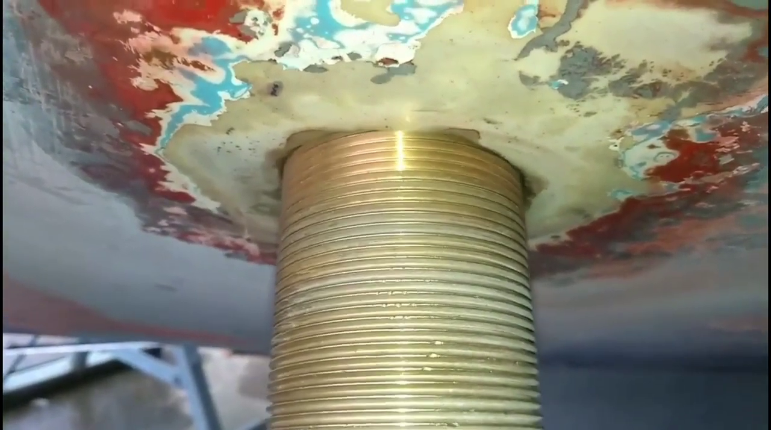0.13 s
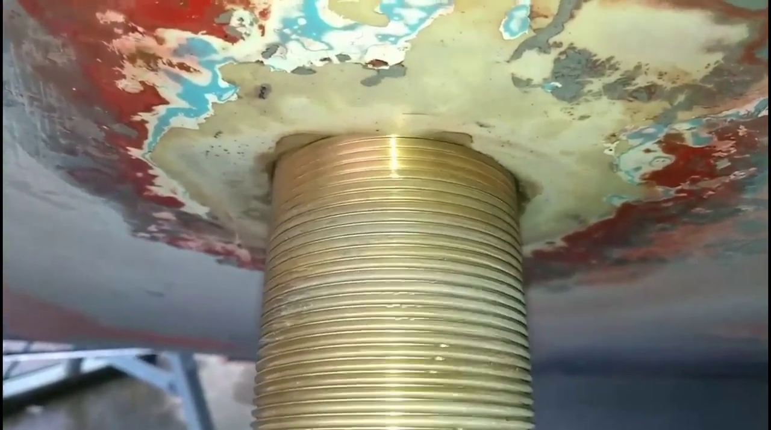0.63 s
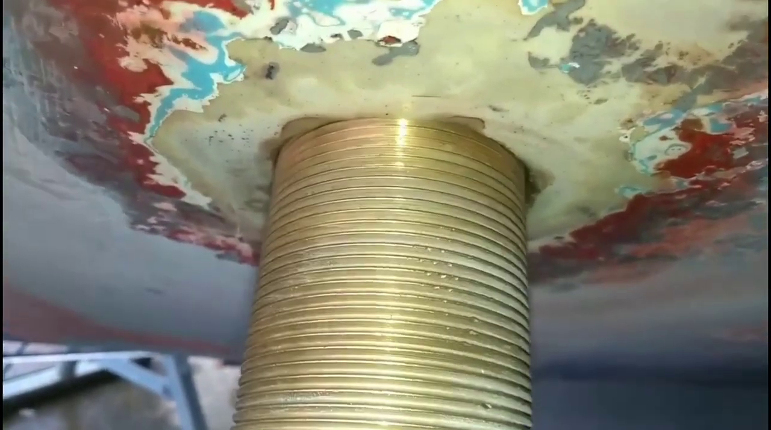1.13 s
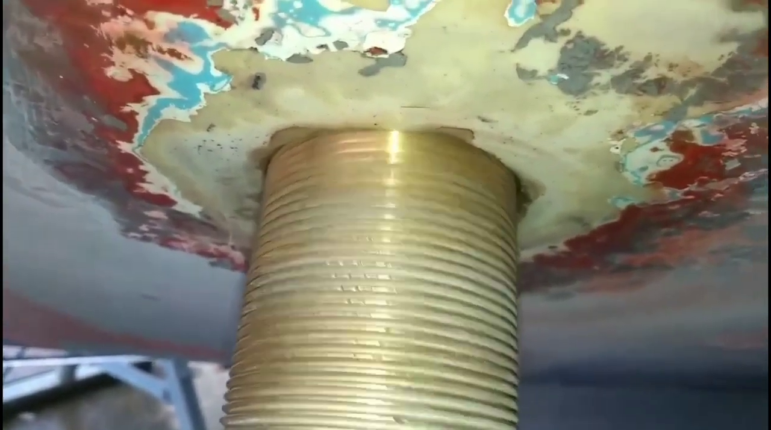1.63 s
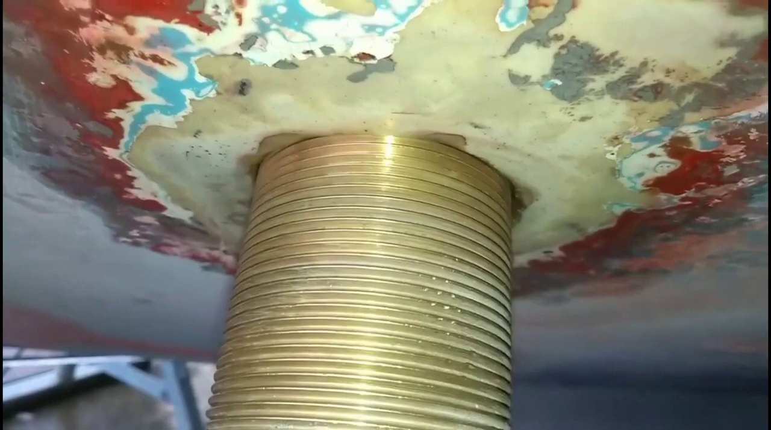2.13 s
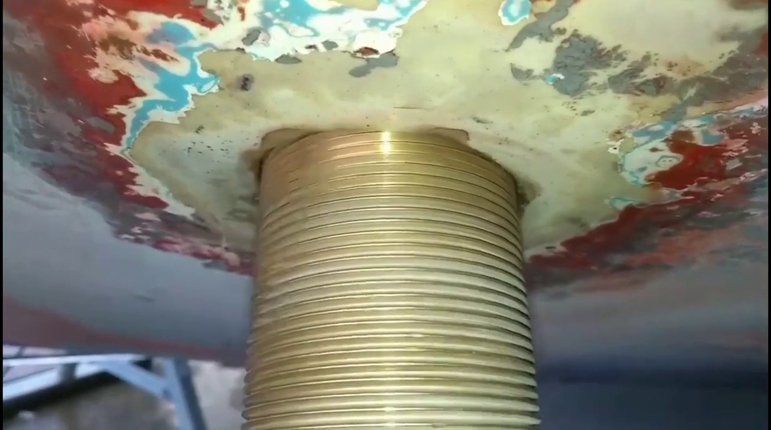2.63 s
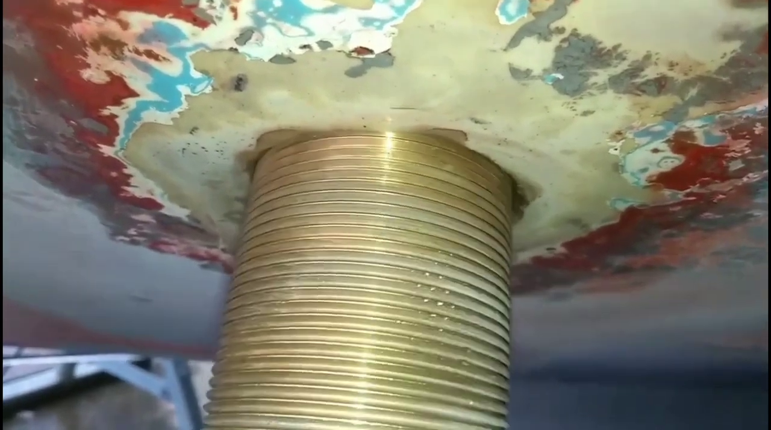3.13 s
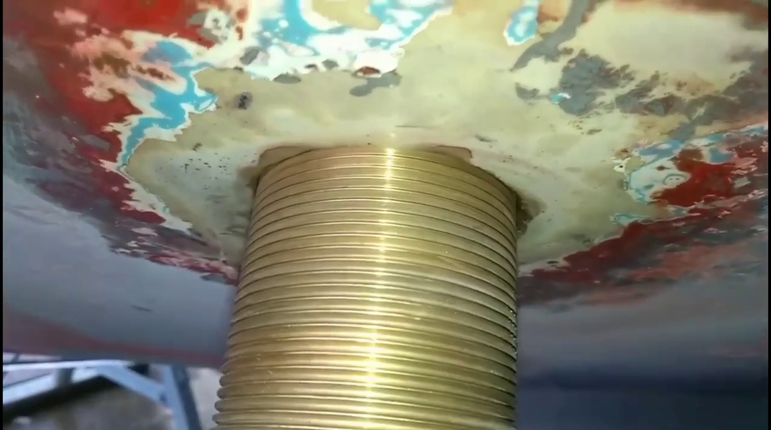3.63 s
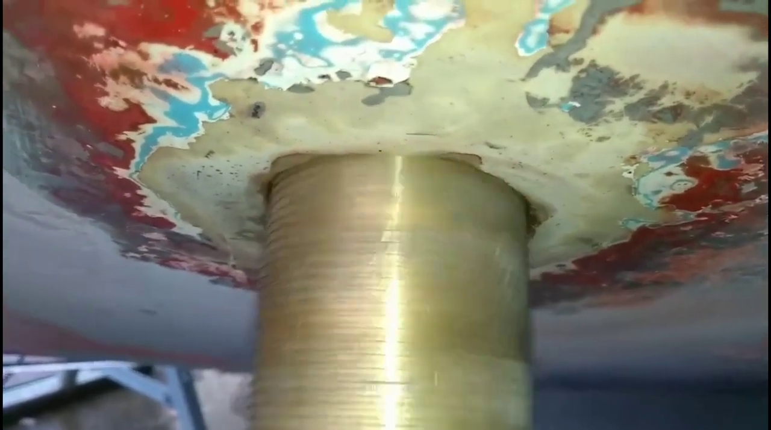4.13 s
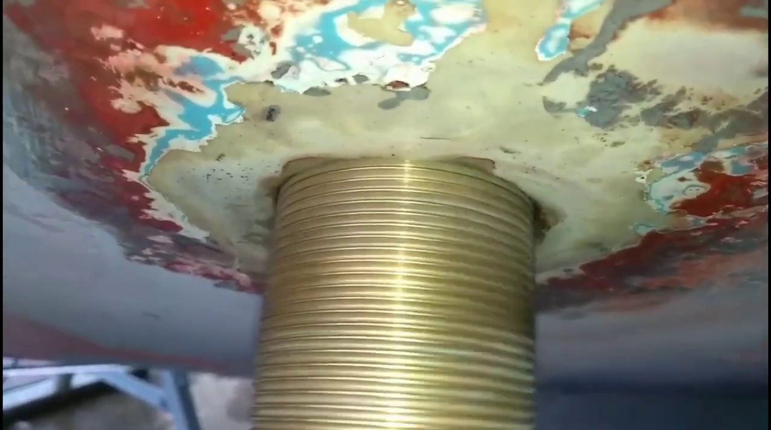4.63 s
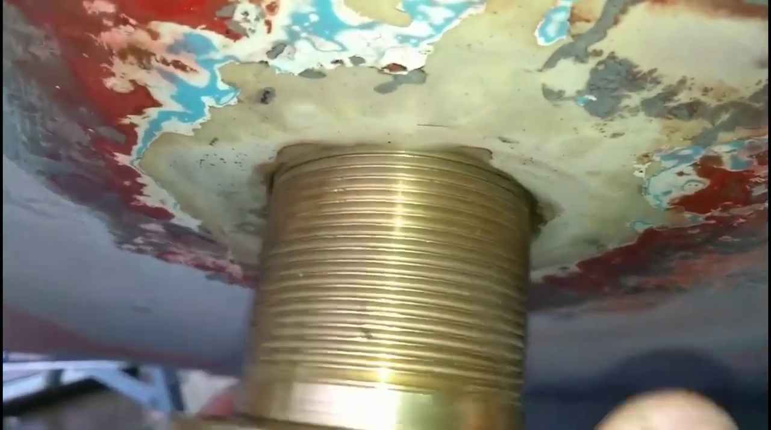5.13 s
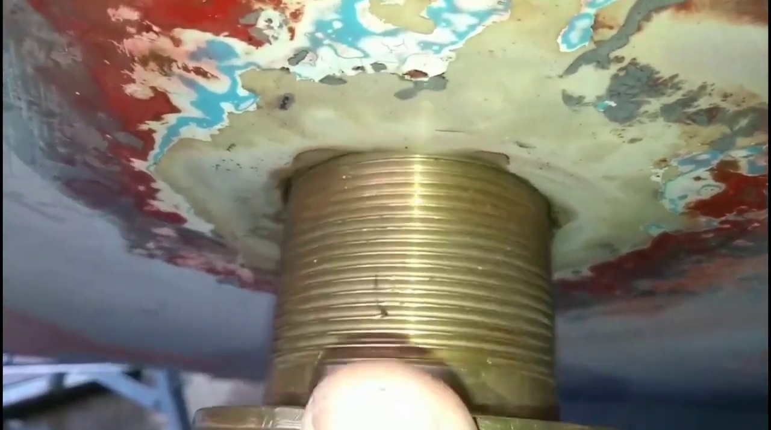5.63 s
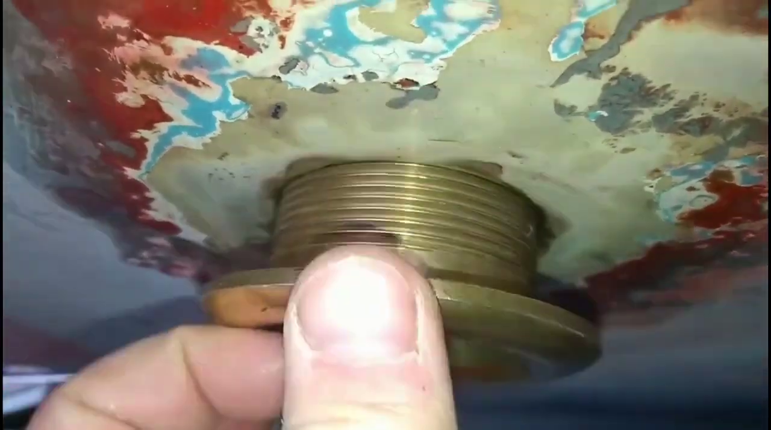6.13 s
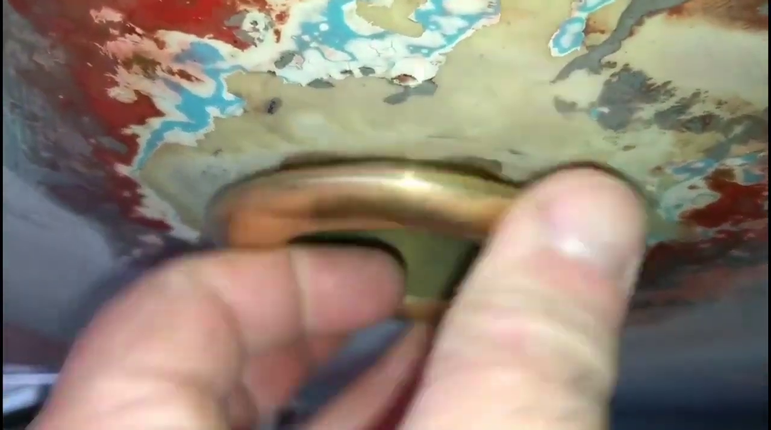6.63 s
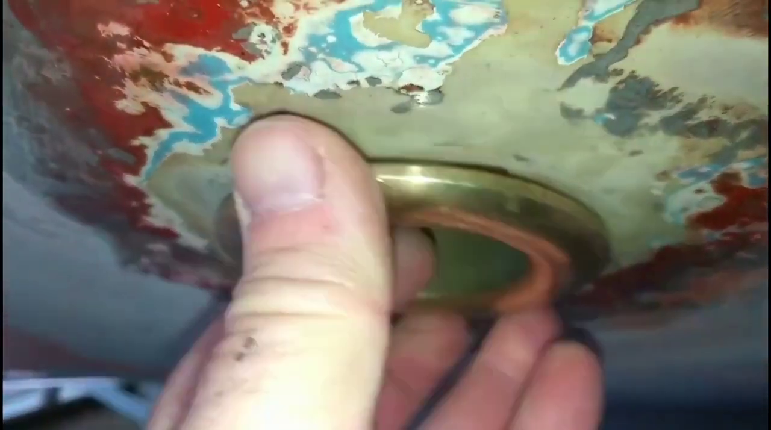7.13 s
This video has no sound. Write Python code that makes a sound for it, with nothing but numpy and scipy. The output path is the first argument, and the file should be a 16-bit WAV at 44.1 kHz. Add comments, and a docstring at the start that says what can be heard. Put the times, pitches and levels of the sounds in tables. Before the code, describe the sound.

Quiet yard hum, faint metal hiss and scattered hull knocks, then thicker scraping and clinking that peaks in two loud bursts of metallic rattling.

```python
"""A quiet yard hums throughout, with rumble from handling and breeze; a brass tube murmurs faintly under the fingers.
Rocked and pushed by hand into a tight hole in a hollow boat hull, it gives faint treble hiss and scattered knocks.
A hard knock at 3.4 s leads to dry rasps; from 4 s on the threads catch more thickly and the tube clinks more.
The loudest burst, near 6 s, and another near 6.8 s knock the hull and ring the tube; then the yard remains.
Knocks and clinks are sums of dying modes, grind and hiss are dense tiny slips plus noise, yard and rumble noise."""
import sys
import numpy as np
from scipy import signal
from scipy.io import wavfile
from scipy.ndimage import uniform_filter1d

SR = 44100
rng = np.random.default_rng(int(sys.argv[2]) if len(sys.argv) > 2 else 0)


def elevation(decibels):
    """Turn decibel levels (scalar or array-like) into linear amplitude ratios."""
    levels = np.asarray(decibels, float)
    return 10 ** (levels / 20)


def dump_mix(stems):
    """Bounce the given channels to the path in sys.argv[1] as a 16-bit WAV at rate SR."""
    frames = np.atleast_2d(stems).T  # one column per channel
    limited = np.clip(frames, -1, 1)  # hard clip at full scale
    pcm = np.round(limited * 32767).astype(np.int16)
    wavfile.write(sys.argv[1], SR, pcm)


N = 320607  # length in samples


def evened(x):
    """Scales to rms 1."""
    return x / np.sqrt(np.mean(x ** 2) + 1e-20)


def peaked(x):
    """Scales to peak 1."""
    return x / (abs(x).max() + 1e-20)


def bandpass(x, order, low_hz, high_hz):
    """Keeps one band of x."""
    return signal.sosfilt(signal.butter(order, [low_hz, high_hz], "band", fs=SR, output="sos"), x)


def levelled(x, low_hz, high_hz):
    """Scales x so that one band of it has rms 1."""
    return x / bandpass(x, 4, low_hz, high_hz).std()


def read(points, hz):
    """Reads a table on a log-frequency axis."""
    f, value = np.transpose(points)
    return np.interp(np.log(hz + 1), np.log(f + 1), value)


def rising(t, rise):
    """Soft start over rise seconds."""
    return 1 - np.exp(-(t / rise) ** 2)


def wander(shape, span):
    """Slow random drift of rms 1: white noise averaged twice over span samples."""
    x = uniform_filter1d(rng.standard_normal(shape), span)
    return evened(uniform_filter1d(x, span))


def add(mix, s, sound):
    """Mixes a sound in at s seconds."""
    part = mix[round(s * SR):][:len(sound)]
    part += sound[:len(part)]


def noise(spectrum, patchy_db, size):
    """Random short-time spectra with drifting patches."""
    hz = np.fft.rfftfreq(size, 1 / SR)
    real, imag, patches = rng.standard_normal((4 * N // size + 5, len(hz), 3)).T
    patches = uniform_filter1d(patches, 10, 0)  # across frequency
    patches = evened(uniform_filter1d(patches, 6, 1))  # across time
    z = (real + 1j * imag) * elevation(read(spectrum, hz)[:, None] + patchy_db * patches)
    return evened(signal.istft(z, nperseg=size, noverlap=3 * size // 4)[1][:N])


def rings(modes, t, lag=0):
    """One dying sine for each mode; all fall into step lag seconds after the start."""
    hz, db, t60 = np.transpose(modes)[:, :, None]
    return elevation(db - 60 * t / t60) * np.sin(2 * np.pi * hz * (t - lag))


def detuned(modes, ratio):
    """The same modes with each frequency multiplied by its ratio."""
    moved = modes.copy()
    moved[:, 0] *= ratio
    return moved


def chatter(modes, per_s, spread_db):
    """Tiny uneven slips, each striking every mode with its own strength."""
    slips = elevation(spread_db * np.minimum(rng.exponential(1, N), 4)) * (rng.random(N) < per_s / SR)
    at, out = np.flatnonzero(slips), np.zeros(N)
    for hz, db, t60 in modes:
        force, radius = slips.copy(), elevation(-60 / t60 / SR)
        force[at] *= rng.standard_normal(len(at))
        turn = 2 * np.pi * hz / SR
        resonator = [1, -2 * radius * np.cos(turn), radius * radius]
        out += elevation(db) * signal.lfilter([np.sin(turn)], resonator, force)
    return evened(out)


# colour of the distant wash: (f/Hz, relative level/dB per Hz)
YARD_COLOUR = [(65, -42), (110, -10), (171, -1), (378, -16.5), (550, -12.5), (909, -13.5), (1700, -18),
               (3120, -30.5), (7360, -29.5), (8340, -33.5), (10100, -31), (12400, -30), (13000, -41.5),
               (15000, -40.5), (16300, -52.5)]
# handling and breeze on the microphone: (t/s, level/dB), before the gusts
RUMBLE_LEVEL = [(0, -70), (.3, -61.5), (.55, -65.5), (3.9, -67.5), (4.0, -53.5), (4.4, -52.5), (4.7, -60.5),
                (5.1, -50), (5.5, -68.5), (5.85, -62), (5.999, -50), (6.4, -63.5), (7.27, -65)]
# colour of that rumble: (f/Hz, relative level/dB per Hz)
RUMBLE_COLOUR = [(25, -18), (50, -1.5), (88, 6), (125, -18.5), (300, -51.5), (600, -91)]


def yard():
    """Steady distant wash and a low rumble that swells and comes in gusts, both shaped noise."""
    s, db = np.transpose(RUMBLE_LEVEL)
    gusts_db = 1.4 * wander(N, 2500)
    swell = elevation(np.interp(np.arange(N) / SR, s, db) + gusts_db)
    wash = elevation(-72) * noise(YARD_COLOUR, 0.34, size=4096)
    return wash + swell * noise(RUMBLE_COLOUR, 1.6, size=4096)


# reverberation inside the hull: (f/Hz, t60/s)
CABIN_DECAY = [(150, 0.16), (500, 0.12), (1500, 0.11), (5000, 0.092)]


def cabin(x):
    """The hollow behind the hull: sparse taps of random sign, each band dying at its own speed."""
    taps = np.zeros(SR // 2)
    at = np.arange(300, len(taps) - 20, 20)
    taps[at + rng.integers(0, 20, len(at))] = rng.choice([-1., 1.], len(at))
    hz, t, z = signal.stft(taps, SR, nperseg=256)
    tail = signal.istft(z * elevation(-60 * t / read(CABIN_DECAY, hz)[:, None]), SR, nperseg=256)[1]
    return signal.oaconvolve(x, tail / np.linalg.norm(tail))[:N]


SEATED_S = 4.4  # from about here the tube sits deep in the hole
# modes of the brass tube, also played by rub() and clinks(): (f/Hz, relative level/dB, t60/s)
TUBE_MODES = [(2367, -4, 0.15), (2433, 5, 0.033), (3867, 2.5, 0.15), (3910, -12, 0.09), (5900, -12, 0.16),
              (6447, 4, 0.13), (6680, -5, 0.067), (7030, -1.5, .05), (7546, 2, 0.14), (8160, -1, 0.14),
              (9400, -6.5, 0.12), (9770, -7.5, 0.074), (11590, -11, 0.08), (11930, -2.5, 0.11),
              (13010, -9.5, .08), (14620, -17, .07), (15216, -11.5, .09)]


def murmur():
    """Resting fingers shift a little and keep middle rings of the tube alive until it is seated."""
    seating_s = .3
    free = 1 / (1 + np.exp((np.arange(N) / SR - SEATED_S) / seating_s))
    drift = elevation(2.5 * wander(N, 4000))
    middle = [TUBE_MODES[5], TUBE_MODES[7], TUBE_MODES[8]]
    return elevation(-91.5) * drift * free * chatter(middle, 150, 2.5)


# dry drags of the thread flank: (start t/s, length/s, level/dB)
RASP_STROKES = [(3.505, .055, -62), (3.57, .1, -74), (3.66, .15, -67), (4.87, .33, -64)]
# their colour: (f/Hz, relative level/dB per Hz)
RASP_COLOUR = [(1500, -35), (2000, -8), (2900, -2), (3300, -33), (5500, -8), (6300, 5), (7800, -3),
               (8500, -41)]


def rasp():
    """The thread flank drags: short strokes of grainy noise that swell and fade."""
    start, length, db = np.transpose(RASP_STROKES)[:, :, None]
    progress = np.clip((np.arange(N) / SR - start) / length, 0, 1)
    stroke = np.sin(np.pi * progress) ** 0.3
    grain = elevation(2.0 * evened(uniform_filter1d(rng.standard_normal(N), 90)))
    return (elevation(db) * stroke).sum(0) * evened(grain * noise(RASP_COLOUR, 1.8, size=512))


# swells of grind and hiss; the quiet ones are mostly faint treble hiss:
# (start t/s, rise/s, hold/s, grind peak level/dB, hiss peak level/dB)
# grind level is that of its 2.6-3.5 kHz band, hiss level that of its 8.6-11.3 kHz band
RUB_SWELLS = [(0.248, 0.022, 0.1, -99, -75), (0.603, 0.011, 0.023, -87, -77),
              (1.072, 0.013, 0.016, -87, -64), (1.138, 0.029, 0.059, -86, -76),
              (1.269, .01, 0, -87.5, -74.5), (1.491, .01, 0, -101, -78), (1.851, 0.018, 0.14, -88.5, -73.5),
              (2.091, 0.1, 0.072, -98, -71.5), (2.195, 0.024, 0, -68, -68.5),
              (2.438, 0.079, 0.15, -89.5, -75.5), (2.797, 0.011, 0.022, -80.5, -67),
              (3.197, 0.018, 0, -57.5, -61), (3.411, 0.01, 0.11, -68, -67.5),
              (3.551, 0.11, 0.15, -92.5, -74.5), (3.962, 0.084, 0, -62, -62.5),
              (4.192, 0.04, 0.00075, -67.5, -60), (4.286, 0.048, 0.071, -60, -60.5),
              (4.547, 0.034, 0, -62, -60), (4.789, 0.1, 0.4, -56.5, -66), (5.033, 0.041, 0.12, -58.5, -67),
              (5.352, 0.025, 0.038, -68.5, -69.5), (5.643, 0.0069, 0.018, -68, -62.5),
              (5.801, 0.016, 0.15, -107, -72), (5.895, 0.025, 0.2, -46, -59),
              (5.944, 0.01, 0.048, -48, -55), (6.183, 0.013, 0, -48, -47.5), (6.685, 0.042, 0.18, -53, -64)]


def swelling():
    """Levels of grind and hiss: each swell rises, sags while it holds and dies away; they add in power."""
    swell_db, longest_hiss_rise_s = 32, 0.034
    start, rise, hold, grind_db, hiss_db = np.transpose(RUB_SWELLS)[:, :, None]
    t = np.arange(0, N, 32) / SR
    age = t - start
    held, late = np.clip(age - rise, 0, hold), np.maximum(age - rise - hold, 0)

    def level(peak_db, up, sag_db_per_s, fall_db_per_s):
        """Level of one layer in time."""
        shape_db = peak_db - swell_db * np.maximum(1 - age / up, 0)
        shape_db = shape_db - sag_db_per_s * held - fall_db_per_s * late
        return np.interp(np.arange(N) / SR, t, np.linalg.norm(elevation(shape_db), axis=0))

    # the hiss lingers: it sags and falls more slowly
    return level(grind_db, rise, 63, 321), level(hiss_db, np.minimum(rise, longest_hiss_rise_s), 15, 186)


# hull panel and the air it encloses, also played by knocks(): (f/Hz, relative level/dB, t60/s)
HULL_MODES = [(128, -17.5, 0.028), (160, -6, 0.032), (178, 2.5, 0.13), (222, -6, 0.24), (260, -3, 0.16),
              (426, 2.5, 0.06), (440, 10.5, 0.1), (485, 9, 0.068), (536, 1, 0.017), (646.4, 5, 0.085),
              (713, 8.5, 0.06), (713, 0.5, 0.051), (820, -2, 0.026), (979, -2.5, 0.074), (1080, 3.5, 0.033),
              (1194, 6.5, 0.024), (1266, 0.5, 0.038), (1602, -8, 0.023), (1650, -6, 0.028),
              (1810, -4.5, 0.041), (2052, -7.5, 0.023)]
# colour of the grit in the grind: (f/Hz, relative level/dB per Hz)
GRIT_COLOUR = [(250, -6.5), (500, 15), (1200, 11.5), (2200, 7.5), (3000, -2), (5000, 1), (6500, -2.5),
               (7600, 1), (8500, -29)]
# colour of the treble hiss, strongest from 7.7 to 12 kHz: (f/Hz, relative level/dB per Hz)
HISS_COLOUR = [(2500, -30), (4000, -16), (6000, -14.5), (7300, -5), (7700, 1.5), (11900, -1.5),
               (12300, -10.5), (15500, -14)]


def rub():
    """Rubbing threads grind in the hull; a treble hiss swells with a faint singing of the tube."""
    grind, hiss = swelling()
    # favour hull modes near 480 Hz, ringing longer than when knocked, and tube modes near 8.5 kHz
    hull = [(hz, db - 8 * abs(np.log2(hz / 480)), 1.5 * t60) for hz, db, t60 in HULL_MODES]
    tube = [(hz, db - 5 * abs(np.log2(hz / 8500)), t60) for hz, db, t60 in TUBE_MODES]
    # roughness of the rim makes the grit come in short clumps
    clumps = elevation(3.3 * wander(N, 90))
    grit = evened(clumps * noise(GRIT_COLOUR, 4.4, size=512))
    grinding = 1.6 * chatter(hull, 260, 4.4) + 0.17 * chatter(TUBE_MODES[:5], 900, 1.5) + grit
    hissing = 0.28 * chatter(tube, 500, 1.8) + noise(HISS_COLOUR, 2.7, size=1024)
    return grind * levelled(grinding, 2600, 3500), hiss * levelled(hissing, 8600, 11300)


# tube set ringing: (t/s, level/dB of the 3.9 kHz pair before a common trim,
# level/dB of the 2.4 kHz ring and level/dB of the upper rings, both relative to the pair)
TUBE_CLINKS = [(1.0876, -70, 16.5, 14), (1.9031, -68, 1, 6), (2.2058, -47, -1, 8.5), (2.456, -79, 9, 8),
               (2.5661, -64.5, 24, 4), (2.822, -79, -6, 19.5), (3.2126, -60, 21, 18),
               (3.4303, -59.5, 23.5, 0), (3.4411, -49, 15.5, 10.5), (4.0411, -64, 15, -1),
               (4.0589, -60, 18, 8.5), (4.226, -51, 13, 12), (4.308, -63.5, 28.5, 16),
               (4.341, -43.5, -7, -4), (4.356, -34.5, -3, -0.5), (4.3924, -40.5, 2, -2.5),
               (4.5856, -42.5, 3.5, -12), (4.879, -43.5, 9.5, 0), (4.9099, -33, -17, -11.5),
               (4.9415, -36.5, 7.5, -3), (4.9786, -36, -2, -2.5), (5.0028, -43, 3, -4),
               (5.024, -46, -13, 2.5), (5.051, -41.5, -7, -4), (5.0798, -40.5, 3, 2),
               (5.1128, -35, -3, -5.5), (5.1589, -51, 1, 1), (5.179, -50, 8, 4.5),
               (5.3802, -42.5, 6, -13.5), (5.6508, -40, -13, -0.5), (5.6729, -45.5, -7, -2.5),
               (5.819, -64, -11, 6), (5.8977, -40.5, -13.5, -8.5), (5.9201, -34, -4.5, 5.5),
               (5.9423, -25.5, -8, -1), (5.9573, -28, -9, 4), (5.9732, -17, -15, -7.5),
               (6.0029, -17.5, -12.5, -14.5), (6.0312, -13.5, -16.5, -27), (6.0484, -21.5, -15, -15.5),
               (6.0866, -24.5, -30, -22), (6.11, -32, -15.5, -27), (6.1933, -26, -32, -9.5),
               (6.2242, -35, -12, -3), (6.4118, -61, -10, -7.5), (6.7266, -30.5, -8.5, -31),
               (6.748, -26.5, -20, -36), (6.7678, -23.5, -9, -18), (6.7888, -30.5, -7, -10.5),
               (6.813, -27.5, -14.5, -25.5), (6.8256, -32, -3.5, -14), (6.8454, -27.5, -18, -23),
               (6.8748, -30.5, -21, -20.5), (6.909, -68, 25, 10)]
# borders between the six families of tube modes: (f/Hz)
FAMILY_BORDERS = [3000, 5000, 6100, 6900, 8800]
# upper rings thin out in the families near 6.5, 8 and above 9 kHz: (level/dB)
UPPER_TRIM = [-3.5, -3.5, -5.5]
# how strongly later contacts and the flutter and fade act on each family, low to high: (share)
CHOKE_SHARE = [.3, .8, .4, .4, .4, .6]


def clinks():
    """Where the tube is touched sets which mode families ring; later contacts choke them."""
    t, out, tube = np.arange(8000) / SR, np.zeros(N), np.array(TUBE_MODES)
    family = np.searchsorted(FAMILY_BORDERS, tube[:, 0])
    times, count = np.transpose(TUBE_CLINKS)[0], len(TUBE_CLINKS)
    luck = rng.standard_normal((count, 2, len(tube)))
    scuffs = rng.standard_normal((count, len(t)))
    scuffs = signal.lfilter(*signal.butter(2, [3000, 10500], "band", fs=SR), scuffs)
    scuffs = scuffs * elevation(-60 * t / 0.01) * rising(t, 0.00079)
    # each ring flutters and fades ever faster
    fades = elevation(1.8 * wander((count, len(t)), 200) - 9.0 * (t / 0.12) ** 2)
    choked = np.array(CHOKE_SHARE)[family, None]
    for (s, db, low_db, upper_db), (spot, detune), scuff, fade in zip(TUBE_CLINKS, luck, scuffs, fades):
        modes = rings(detuned(tube, 1 + .0005 * detune), t)
        # the 5.9 kHz ring comes forward once the tube is seated
        middle_db = upper_db / 2 + 6 * (s > SEATED_S)
        family_db = np.array([low_db, 0, middle_db, *np.add(upper_db, UPPER_TRIM)])[family]
        share = elevation(family_db - 4.0 + 4.8 * spot * (family != 1))
        # each later contact takes 5 dB, times the family's share, within 2 ms
        later = times[(times > s) & (times < s + t[-1]), None] - s
        choke = elevation(-5 * np.clip((t - later) / .002, 0, 1).sum(0))
        ring = rising(t, 0.003) * (share @ (modes * (fade * choke) ** choked))
        add(out, s, elevation(db) * (ring + elevation(upper_db - 4.5) * scuff))
    return out


# a thread catches the rim: (t/s, blow level/dB, hull note f/Hz, crack level/dB, thump level/dB)
# crack and thump are relative to the blow, before a common trim for each
THREAD_KNOCKS = [(0.626, -33.5, 457, -22, -24.5), (1.102, -45.5, 486, -46, -28),
                 (1.158, -41, 470, -32, -38), (1.182, -44, 480, -22, -10.5), (1.221, -32, 465, -24, -19.5),
                 (2.222, -21.5, 504, -15, -16), (2.565, -16.5, 480, -14, -36.5),
                 (2.811, -28.5, 496, -21, -7.5), (3.195, -45, 476, -29, -27), (3.211, -35, 440, 11, -17),
                 (3.225, -25, 400, -4, -17.5), (3.236, -21, 373, -19.5, -25.5),
                 (3.424, -21, 436, -16.5, -31), (3.442, -2.5, 478.5, -11, -24.5),
                 (3.471, -26, 471, -19.5, -15), (4.026, -35, 434, -18, -18), (4.04, -27, 384, -1.5, -9),
                 (4.064, -21.5, 440, -5.5, -15.5), (4.215, -25, 438, -32, -45), (4.227, -23, 482, -8, -37),
                 (4.232, -8, 472, -4.5, -47), (4.311, -22, 460, -2.5, -4.5), (4.328, -25, 454, -7, -7),
                 (4.341, -17.5, 440, -12, -22), (4.356, -12, 430, -9.5, -16.5),
                 (4.393, -17.5, 405, -5, -4.5), (4.555, -32, 472, -23, -28), (4.586, -10.5, 516, -10, -21),
                 (4.807, -32, 484, -38, -49.5), (4.824, -37, 468, -38, -38), (4.875, -22.5, 610, -10, -24),
                 (4.888, -27, 520, -7, -27), (4.908, -24, 534, -3.5, -16.5), (4.931, -17, 416, -11, -47),
                 (4.952, -18, 670, 1.5, -40), (4.976, -27, 546, 4, -25), (4.985, -12, 440, -5, -20),
                 (5.012, -19.5, 449, -10.5, -14), (5.023, -20, 477, -9.5, -32.5),
                 (5.048, -24, 427, -12, -25), (5.059, -22.5, 430, -28, -25), (5.078, -31, 450, -14, -10),
                 (5.102, -20.5, 428, -13, -19), (5.16, -20, 427, -29, -19.5), (5.176, -22, 440, -4.5, -12),
                 (5.318, -29, 422, -22.5, -26), (5.371, -13, 434, -39.5, -19.5),
                 (5.382, -4, 473, -8.5, -20), (5.654, -36, 448, -24, -20), (5.672, -16, 540, -15, -23),
                 (5.705, -26.5, 484, -11.5, -16.5), (5.805, -37, 454, -28.5, -15.5),
                 (5.827, -35.5, 402, -20, -11.5), (5.9, -22, 469, 1.5, -26.5), (5.92, -3, 419, -3, -24.5),
                 (5.94, -13, 494.5, -7, -16), (5.964, -1.5, 452, -7, -23.5),
                 (5.973, -2.5, 419.2, -12.5, -26.5), (5.985, -18.5, 445, -9, -21),
                 (5.997, -11.5, 378.5, -6.5, -19.5), (6.006, 2.5, 439, -1, -19.5),
                 (6.029, 1, 438, -1.5, -31.5), (6.048, -2.5, 445, -5.5, -16),
                 (6.064, -14.5, 432, -4.5, -15), (6.087, -5, 415, 1.5, -14), (6.202, -12.5, 426, -9, -16.5),
                 (6.227, -7.5, 444, -19.5, -20.5), (6.277, -26, 463, -26, -27),
                 (6.351, -39.5, 430, -18, -20), (6.426, -28, 440, -24, -23.5), (6.7, -25, 491, -22, -17.5),
                 (6.716, -2.5, 455.3, -10.5, -20), (6.748, -13, 478, -7, -13.5),
                 (6.756, -20, 454, -10, -27), (6.769, -5.5, 502, 0.5, -19), (6.778, -9.5, 459, -7.5, -21),
                 (6.789, -8, 423.7, 0.5, -16.5), (6.811, -2.5, 466, 1, -24.5),
                 (6.825, -8.5, 426, -32.5, -14.5), (6.849, -9, 459, -1.5, -50),
                 (6.875, -10.5, 402, -6.5, -48), (6.899, -24.5, 380, -23, -16)]


def knocks():
    """Each blow favours panel modes near its note, with a crack and a thump; sharper cracks start faster."""
    t, out, hull = np.arange(5000) / SR, np.zeros(N), np.array(HULL_MODES)
    hz = hull[:, 0]
    low, high = hz < 300, hz > 880
    luck = rng.standard_normal((len(THREAD_KNOCKS), len(hull), 2))
    grit = rng.standard_normal((len(THREAD_KNOCKS), len(t)))
    grit = bandpass(grit, 4, 800, 2010) + elevation(-20.5) * bandpass(grit, 4, 3000, 5000)
    grit = grit * elevation(-60 * t / 0.0089)
    # the tube rebounds for 13 ms, then rests on the rim again and damps the panel by 15 dB
    settle = elevation(-15 * rising(np.maximum(t - .013, 0), .004))
    for (s, db, note_hz, crack_db, thump_db), spot, burst in zip(THREAD_KNOCKS, luck, grit):
        # modes below the crack fall into step this many seconds in, later for a weaker crack
        gather = .003 * elevation(-.1 * crack_db)
        # hull modes are detuned slightly at random from blow to blow
        modes = rings(detuned(hull, 1 + 0.038 * spot[:, 1]), t, gather * ~high[:, None])
        share = elevation(4.8 * spot[:, 0])
        near = elevation(-np.minimum(90 * np.log2(hz / note_hz) ** 2, 12))
        body = peaked((share * near * ~low * ~high) @ modes) * settle
        thump = peaked((share * low) @ modes) * settle ** .6
        snap = peaked((share ** 0.49 * high) @ modes) * settle
        crack = peaked(snap + 0.47 * peaked(burst)) * rising(t, 0.00083)
        onset = rising(t, 0.0011 * elevation(-.15 * crack_db))
        blow = onset * (body + elevation(thump_db + 6.5) * thump) + elevation(crack_db + 1.5) * crack
        add(out, s, elevation(db) * blow)
    return out


# narrow dip in the hull sound: (f/Hz, width/Hz)
HULL_DIPS = [(315, 60)]


def scene():
    """Hull and tube, the hollow behind the hull, and the yard."""
    grind, hiss = rub()
    hull, tube = knocks() + grind, clinks() + hiss + murmur() + rasp()
    for hz, width in HULL_DIPS:
        hull = signal.lfilter(*signal.iirnotch(hz, hz / width, fs=SR), hull)
    close = hull + tube + cabin(elevation(-13) * hull + elevation(-29.0) * tube)
    # the microphone passes little deep bass from the close sounds
    close = signal.sosfilt(signal.butter(2, 85, "high", fs=SR, output="sos"), close)
    return (close + yard())[None]


def top_cut(x):
    """Nothing passes above the cut-off."""
    return signal.sosfilt(signal.butter(12, 16440, fs=SR, output="sos"), x)


def record(dry):
    """Peaks clip just below full scale; a steep low-pass at 15.7 kHz follows."""
    edge = signal.firwin(401, 15700, window=("kaiser", 9), fs=SR)
    clipped = np.clip(dry, -.98, .98)
    return top_cut(signal.oaconvolve(clipped, edge[None], "same"))


dry = scene()
out = record(dry)
dump_mix(out)
```